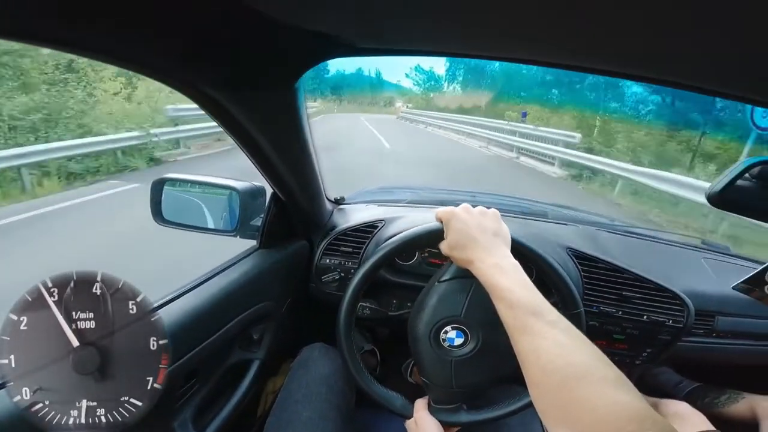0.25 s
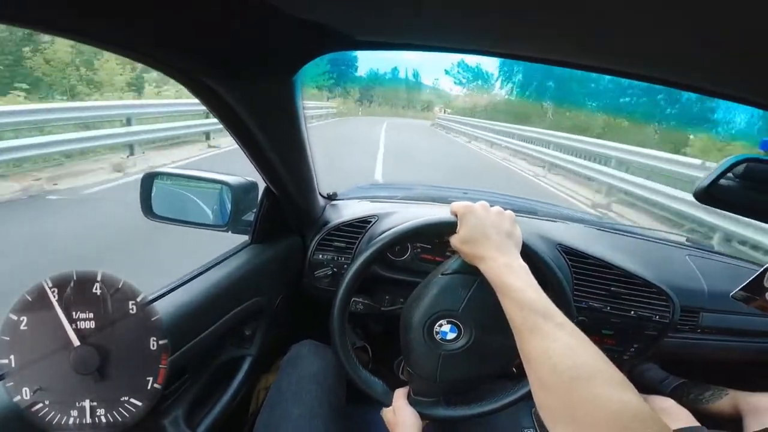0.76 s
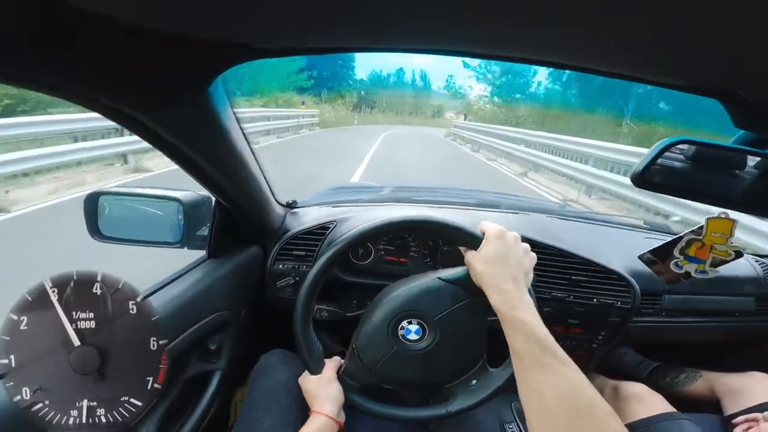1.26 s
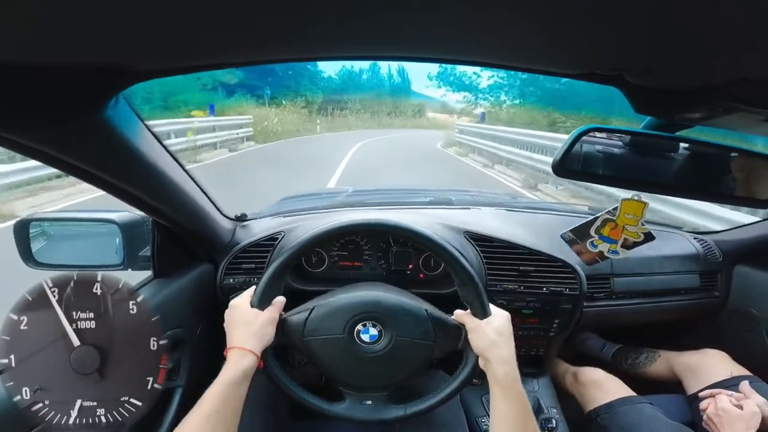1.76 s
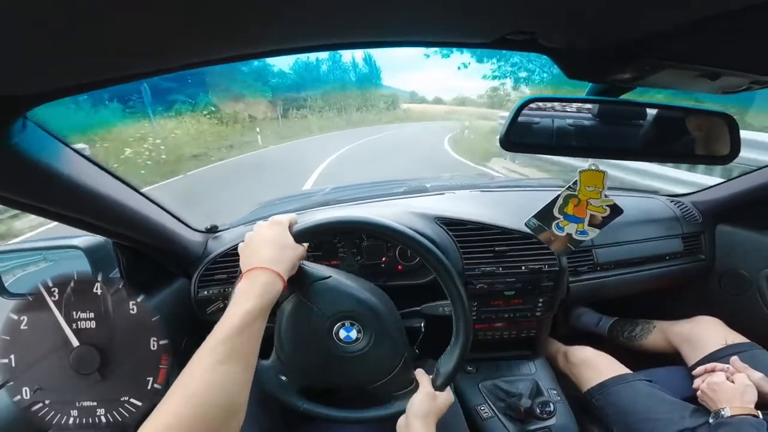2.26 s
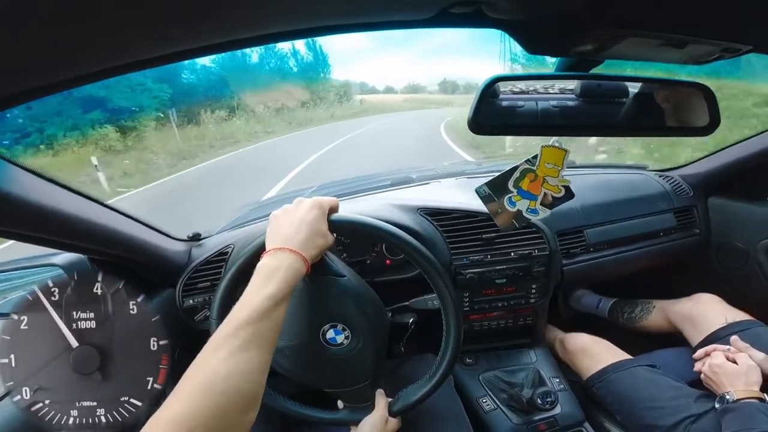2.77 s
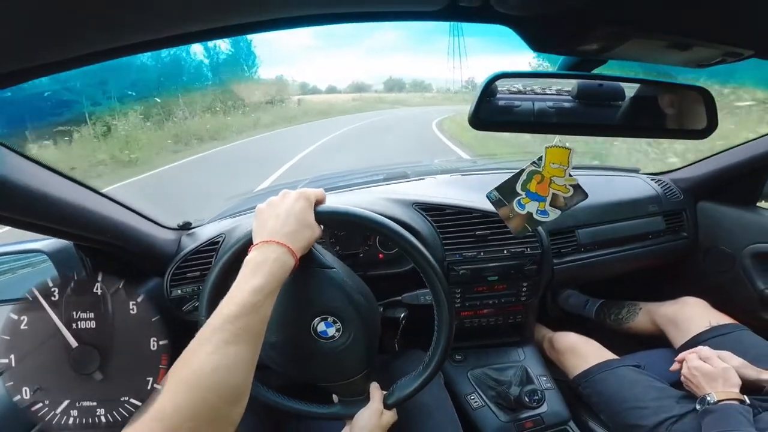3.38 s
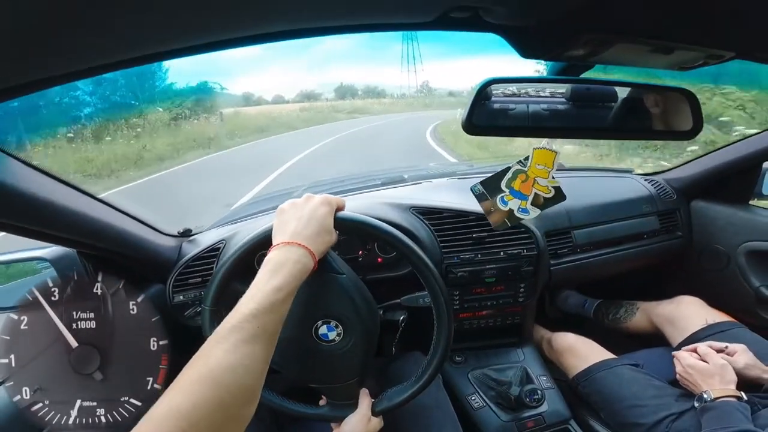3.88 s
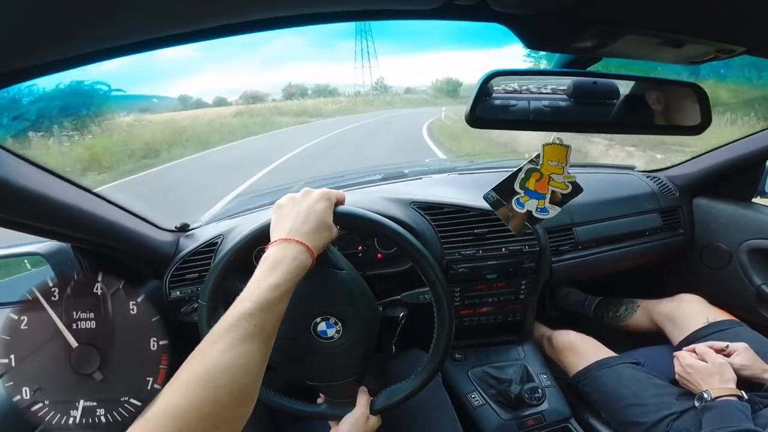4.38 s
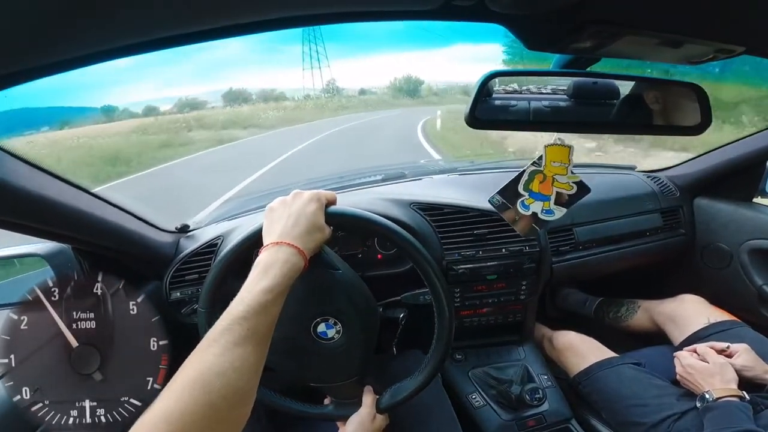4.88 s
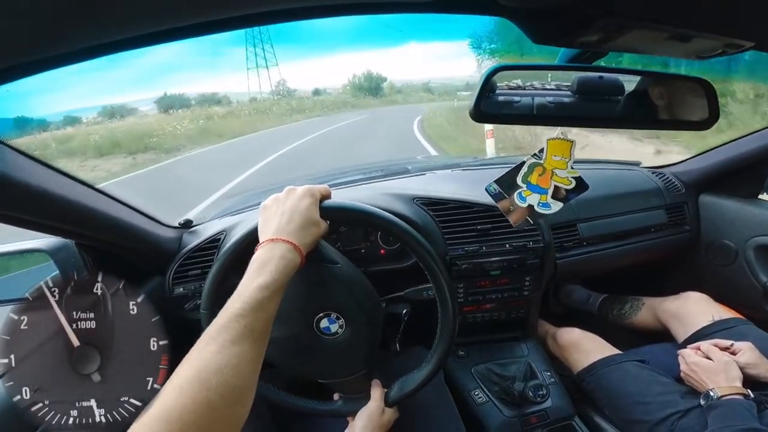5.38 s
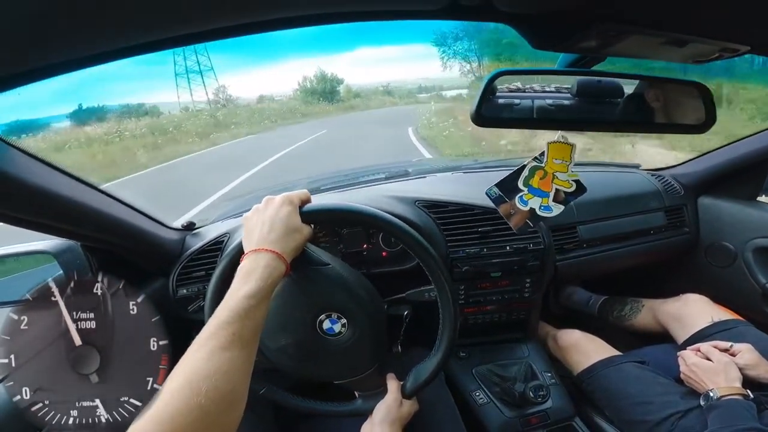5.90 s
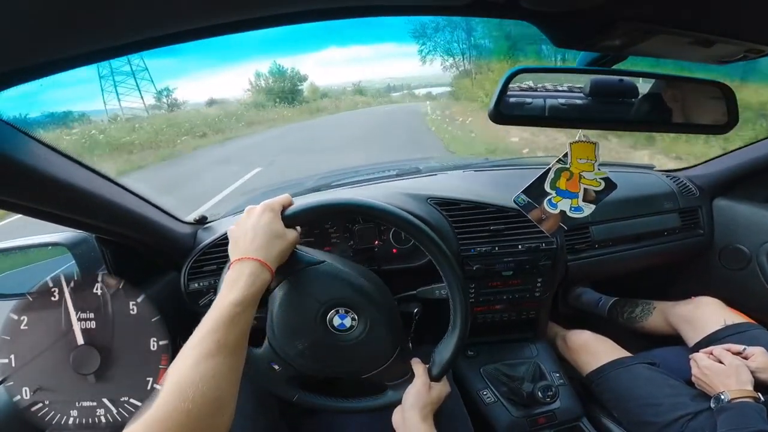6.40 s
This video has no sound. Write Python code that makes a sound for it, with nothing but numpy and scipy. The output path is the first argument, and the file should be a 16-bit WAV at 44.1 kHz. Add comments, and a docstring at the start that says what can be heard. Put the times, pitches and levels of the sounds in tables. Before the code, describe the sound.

Smooth engine drone and tyre roar in a car cabin; throttle eases, trim rattles, a coasting hum follows, then power swells and the note climbs.

```python
"""A straight-six heard from the driver's seat on a country road: its exhaust booms in the cabin as harmonic tones.
It pulls, lifts off with a low burble, coasts with the fuel cut, picks up at part throttle, then pulls up the revs.
Most engine layers follow speed and throttle, tones and noise alike; the block's drone has its own level over time.
Around them lie filtered noise for road and tyres, two road joints, damped jolts and clunks, and buzzing trim.
Two microphone ports close together give each pitch its own left-right balance."""
import sys
import numpy as np
from scipy import signal
from scipy.fft import rfft, irfft
from scipy.io import wavfile

SR = 44100
rng = np.random.default_rng(int(sys.argv[2]) if len(sys.argv) > 2 else 0)


def output_pcm(signal):
    """Save a mono or channel-first signal as 16-bit PCM at the path in sys.argv[1].

    Samples are clipped to [-1, 1] before scaling.
    """
    pcm = np.clip(np.atleast_2d(signal).T, -1, 1) * 32767
    wavfile.write(sys.argv[1], SR, np.round(pcm).astype(np.int16))


N = 293265
TIME, HZ = np.arange(N) / SR, np.fft.rfftfreq(N, 1 / SR)
# the engine's tones lie under 3 kHz and live on a coarser time grid
STEP = 7
COARSE = TIME[::STEP]

# microphone: left minus right port for tones and for noise: f/Hz, level/dB
TONE_SIDE = [(70, 2.5), (145, 0.9), (170, -3.5), (215, -0.5), (285, -2), (345, -7.5), (410, -9.5),
             (600, -4), (780, -4.5), (1200, -1)]
NOISE_SIDE = [(40, -9.5), (100, 13), (170, 3.5), (400, -4), (700, 1.5), (1100, 1), (2200, 0), (4500, 1),
              (8500, -2.5), (13000, 0)]
# likeness of the noise at the two ports: f/Hz, correlation
PORT_LIKENESS = [(40, .93), (250, .88), (600, .8), (1100, .8), (2200, .74), (4500, .58), (8000, .35),
                 (14000, .35)]
TREBLE_EDGE_HZ = 15300  # the highest treble is left out

# road rumble through the body, and tyre and wind roar: f/Hz, level/dB per Hz
RUMBLE = [(12, -102), (22, -91), (40, -77), (70, -73.5), (100, -68), (125, -76), (175, -77.5), (230, -72.5),
          (290, -76), (390, -79.5), (440, -91.5), (500, -89)]
ROAR = [(250, -100), (520, -92.5), (760, -86), (860, -91), (1030, -88), (1400, -99.5), (2380, -100),
        (2560, -109), (2900, -111), (4400, -117.5), (5100, -118), (5800, -124), (10000, -124.5),
        (13000, -124), (15000, -127)]
# coarseness of the road surface: t/s, change of roar level/dB
SURFACE_DB = [(0, 1.5), (1.5, 1.5), (3, -0.5), (4.4, -1), (5.2, 1), (6.65, 2)]
# tyres cross a road joint: t/s, slap level/dB, scuff level/dB, thump level/dB
JOINTS = [(0.709, -42, -55, -32), (1.162, -39, -45, -32)]
# ringing of a struck tyre: f/Hz, level/dB, decay time/s
TYRE = [(960, -3, .008), (1090, 0, .007), (1420, -6, .005), (1700, -11, .005)]

# loose trim buzzes briefly: t/s, sizzle level/dB, lower rattle level/dB, decay time/s, sizzle centre f/Hz
TRIM_BUZZES = [(1.203, -76, -56.5, 0.0074, 6000), (1.374, -59, -55, 0.0054, 7040),
               (1.383, -66, -62, .006, 9500), (1.447, -71, -63, 0.008, 8200),
               (1.507, -69, -62, 0.0044, 6000), (1.543, -67, -62, 0.011, 9800),
               (1.567, -70, -58, 0.0067, 5800), (1.615, -75, -56, 0.0087, 7500),
               (3.012, -73, -66, 0.013, 7000), (3.025, -66, -65, 0.013, 8500),
               (3.197, -71.5, -67, 0.0077, 6000)]
# colour of a sizzle: f/Hz, relative level/dB per Hz
SIZZLE_COLOUR = [(800, -6), (2200, 2), (3000, -1), (5000, 0), (8000, 0), (11000, -4), (12500, -16)]
# resonances of the loose trim: f/Hz, width/Hz, relative level/dB
TRIM_MODES = [(2230, 710, 5), (3300, 600, -4.5), (4260, 240, -5), (4860, 250, -1), (5040, 170, -15)]
BUZZ_ATTACK_S, CONTACTS_PER_S = 0.0025, 2200

# the body jolts at the second road joint and as the load changes:
# t/s, shudder level/dB, thud level/dB, panel boom level/dB
JOLTS = [(1.16, -39.5, -35, -36), (1.225, -36, -45.5, -45.5), (1.274, -34.5, -51.5, -51),
         (1.333, -42, -45.5, -38), (1.434, -37.5, -43.5, -39.5), (1.486, -31.5, -35.5, -44),
         (1.53, -37.5, -40, -34.5), (1.605, -34.5, -37.5, -39), (3.026, -36, -45, -52.5),
         (3.046, -40.5, -42, -30.5), (3.092, -45.5, -36.5, -44), (3.151, -39, -49.5, -51),
         (3.222, -46, -38, -36.5)]
# body shudder, cabin air thud and panel boom after a jolt: f/Hz, level/dB, decay time/s
SHUDDER = [(39.5, -1, 0.032), (65.2, -1, .03)]
CABIN_AIR = [(104, 3, 0.026)]
PANELS = [(186, -3, 0.026), (214.6, -0.5, 0.025)]
# the drive line takes up its slack: t/s, level/dB
CLUNKS = [(1.251, -51), (1.362, -44), (1.378, -44), (1.447, -49), (1.495, -51.5), (1.547, -40),
          (1.614, -39), (3.235, -45)]
# ringing of a clunk: f/Hz, level/dB, decay time/s
CLUNK_MODES = [(395, 3.5, .016), (570, -2.5, 0.012), (690, -0.5, 0.0044), (745, -1, 0.024)]
# rubber mounts cushion each blow: rise times
SHUDDER_SOFT_S, THUD_SOFT_S, CLUNK_SOFT_S = 0.011, 0.0038, 0.0038

# engine speed as the pulse rate of one three-cylinder bank: t/s, f/Hz
BANK_SPEED = [(0.0, 70.83), (0.3, 72.38), (0.75, 74.37), (1.15, 73.63), (1.75, 72.07), (2.3, 69.31),
              (2.75, 67.24), (3.05, 66.52), (3.4, 66.87), (3.65, 67.34), (3.85, 66.95), (4.3, 68.2),
              (4.65, 69.49), (5.0, 71.52), (5.35, 74.06), (5.9, 78.76), (6.65, 86.26)]
CRUISE_HZ = 71.5  # bank pulse rate at cruising speed
# the pedal: t/s, throttle 0-1
THROTTLE = [(0, 0.4), (.45, 0.56), (.8, 0.59), (1.19, 0.4), (1.29, 0.1), (1.41, 0), (1.46, 0.5),
            (1.56, 0.2), (3.15, 0.06), (3.45, 0.2), (4.35, 0.31), (4.65, 0.4), (5.2, 0.76), (6, 0.89),
            (6.65, 0.98)]
# the fuel is cut while the car coasts, and the cylinders only pump air
FUEL_OFF_S, FUEL_ON_S, FUEL_FADE_S, FUEL_RETURN_S = 1.658, 3.016, 0.023, 0.0094

# engine layers at cruising speed: level/dB throttle shut, half open, wide open, coasting; dB more per speed doubling
CLATTER_DB = (-61.5, -58.5, -59.5, -60, 29.5)
VALVES_DB = (-81.5, -82, -80, -80, 36.5)
INTAKE_DB = (-81.5, -89, -75.5, -85.5, 37)
HISS_DB = (-87.5, -87, -79.5, -81.5, 37.5)
RASP_DB = (-62.5, -64.5, -48.5, -56, 18.5)
MUTTER_DB = (-58, -72.5, -74, -74.5, -4)

# engine clatter, and air rushing into the intake: f/Hz, relative level/dB per Hz
CLATTER = [(400, -11), (560, 10), (770, 7.5), (860, 14), (1020, 14.5), (1400, 2), (1600, -3.5), (1900, 1),
           (2380, -11), (2560, -12.5), (3000, -7), (4300, -18.5), (5400, -21), (6000, -19.5)]
INTAKE = [(3200, -5), (5000, -2), (5800, -4), (6500, 0), (7400, -2), (8300, -1), (8900, 1), (9800, -2),
          (11200, -5), (12000, -14)]
# ringing of the valve gear, and resonances of the intake duct: f/Hz, width/Hz, relative level/dB
VALVE_GEAR = [(3640, 150, -4), (3990, 620, 1), (4840, 410, -5), (5320, 310, -5.5)]
DUCT = [(1195, 60, -3), (1615, 48, 0), (2280, 110, -9), (2400, 90, -9.5), (4560, 100, -15),
        (4810, 110, -12.5), (5240, 130, -17.5)]
# share of each mechanical noise that repeats from cycle to cycle
CLATTER_REPEAT, VALVES_REPEAT, DUCT_REPEAT = .62, 0.6, 0.68
# centre of the thin metallic hiss in the exhaust pipe, sliding with the heat of the gas: t/s, f/Hz
PIPE_HISS = [(0, 4380), (1.6, 4600), (2.8, 4450), (4.3, 4730), (5.5, 4630), (6.65, 4730)]

# thin whine on the engine while it coasts: multiple of the cycle rate, level/dB
WHINE_DB = {34: -64, 39: -64, 51: -74, 54: -77}
# resonances of block and cabin, struck by the firings: f/Hz, width/Hz, relative level/dB
BLOCK = [(222, 51, 1.5), (409.4, 28.5, 3.5), (602, 110, -10.5), (769.7, 35.8, 1), (879, 110, -22.5),
         (1207, 49, -22), (1601, 49, -23)]
# pattern of strong and weak cylinders in some low lines: multiple of the cycle rate, change of level/dB
CYLINDER_DB = {7: 5, 8: -8.5, 10: 6, 11: 6, 13: 1.5, 14: -1, 16: -1.5, 17: 2.5, 19: -0.5, 20: 5.5, 22: -3.5,
               23: -1.5, 28: 3.5, 31: 4, 35: 0}
# level of the block's drone: t/s, level/dB
DRONE_LEVEL = [(0, -48.5), (.45, -47.5), (.85, -52), (1.15, -49), (1.37, -48), (1.415, -56.5), (1.47, -50),
               (1.57, -49), (1.75, -65), (2.5, -50.5), (3, -48.5), (3.15, -57), (4.3, -52), (4.65, -47.5),
               (5.5, -46.5), (5.9, -48.5), (6.65, -49)]
# the upper lines hold nearly steady: share of level that wavers, drift of phase
FLUTTER, SCATTER_RAD = .17, .4
# upper exhaust harmonics: f/Hz, relative level/dB
PIPE = [(450, -8), (510, -3.5), (580, 6.5), (700, 4.5), (745, 10), (778, 14), (808, 5.5), (835, -2.5),
        (870, -13.5), (980, 5), (1100, -9), (1200, -14.5), (1400, -16.5), (1650, -16.5), (2200, -12.5),
        (2600, -23)]

# uneven firing around the fuel cut: start t/s, length/s, burble level/dB, change of the second boom harmonic/dB
BURBLES = [(1.169, .43, -47.5, 2), (3.032, 0.28, -50.5, -2)]
BURBLE_ATTACK_S, BURBLE_RELEASE_S = 0.039, 0.045
# colour of the burble: f/Hz, relative level/dB per Hz
BURBLE_COLOUR = [(20, -13), (36, 5.5), (62, 4.5), (110, 6.5), (150, 5.5), (195, 18.5), (260, 4), (310, -3),
                 (410, -6), (500, -16.5), (750, -20), (1100, -64)]
# depth of wavering of the boom and of the upper lines during uneven firing
BOOM_STUMBLE, KNOCK_STUMBLE = .28, .45
# exhaust boom before the cabin gain, a row for each of harmonics 1 to 6 of the bank rate:
# level/dB throttle shut, half open, wide open, coasting
BOOM = [(-45, -46, -52.5, -45.5), (-40, -39.5, -39, -31), (-58, -40, -38.5, -43.5),
        (-57.5, -48, -42.5, -54.5), (-67, -63.5, -50.5, -55), (-56, -49, -50, -57)]
# how the cabin favours each pitch of the boom: f/Hz, gain/dB
CABIN_GAIN = [(66, -2), (86, 4.5), (133, -7.5), (145, -1.5), (160, 7.5), (172, 10), (200, 0), (222, 4),
              (258, 3), (275, 5.5), (318, -12), (336, -0.5), (360, 1.75), (405, 5.5), (428, -2.5),
              (448, -13.5), (480, -10.5), (515, -20)]


def gain_of(db):
    """Decibels to amplitude."""
    return 10 ** (np.asarray(db) / 20)


def evened(x):
    """Scales to rms 1; of a stereo pair, the middle."""
    middle = np.atleast_2d(x).mean(0)
    return x / np.sqrt(np.mean(middle ** 2) + 1e-30)


def curve(rows, column=1, time=TIME):
    """One column of a time table at the given times."""
    rows = np.array(rows)
    return np.interp(time, rows[:, 0], rows[:, column])


def read(points, hz):
    """A spectrum table on a log-frequency axis."""
    f, value = np.transpose(points)
    return np.interp(np.log(hz + 1), np.log(f), value)


def colour(points):
    """Gain of a spectrum table, falling steeply beyond both ends."""
    low, high = points[0][0], points[-1][0]
    return gain_of(read(points, HZ)) * np.minimum(HZ / low, 1) ** 3 / np.maximum(HZ / high, 1) ** 5


def ring(modes, hz):
    """Complex response of steep resonances, each a damped mode squared."""
    return sum(gain_of(db) / (1 + 2j * (hz - f) / width) ** 2 for f, width, db in modes)


def wander(rate_hz, time=COARSE):
    """Slow random drift of rms 1: low-passed noise on coarse knots."""
    knots = np.linspace(0, N / SR, 1024)
    knot_hz = np.fft.rfftfreq(len(knots), knots[1])
    spectrum = rfft(rng.standard_normal(len(knots))) / (1 + (knot_hz / rate_hz) ** 4)
    return np.interp(time, knots, evened(irfft(spectrum)))


def ports(side_db):
    """Left and right gains with a mean of 1."""
    left = 2 / (1 + gain_of(-side_db))
    return np.array([left, 2 - left])


def noise(gain, source=None):
    """Stereo cabin noise with the given amplitude per root Hz, from a white source."""
    white = rng.standard_normal((2, N)) if source is None else source
    common, other = rfft(white)
    likeness = np.clip(read(PORT_LIKENESS, HZ), -.9, 1)
    apart = other * np.sqrt((1 - likeness) / (1 + likeness))
    pair = np.array([common + apart, common - apart])
    return irfft(pair * ports(read(NOISE_SIDE, HZ)) * gain, N) * np.sqrt(SR / 2)


def shaped(points):
    """Noise of rms 1 with the given spectrum."""
    return evened(noise(colour(points)))


def at_ports(x, lag_rad=0.17):
    """Cabin standing waves give each tone its own balance; the left lags in phase above 125 Hz and leads below."""
    z = rfft(signal.resample_poly(x, STEP, 1)[:N]) * ports(read(TONE_SIDE, HZ))
    z[0] *= np.exp(-1j * lag_rad * np.tanh((HZ - 125) / 100))
    return irfft(z, N)


def swell(s, db, half):
    """A bell-shaped envelope around time s."""
    out, near = np.zeros(N), abs(TIME - s) < .15
    out[near] = gain_of(db) * np.exp(-.5 * ((TIME[near] - s) / half) ** 2)
    return out


def burst(s, decay):
    """An envelope that rises quickly at time s and dies away."""
    age = np.clip(TIME - s, 0, 1)
    return np.minimum(age / BUZZ_ATTACK_S, 1) * np.exp(-age / decay)


def strike(modes, s, db, soft_s):
    """A cushioned blow at time s sets damped modes ringing."""
    age = np.maximum(COARSE - s, 0)
    ringing = sum(gain_of(db + mode_db) * np.exp(-age / decay) * np.sin(2 * np.pi * hz * age)
                  for hz, mode_db, decay in modes)
    return (1 - np.exp(-(age / soft_s) ** 2)) * ringing


def coasting(time):
    """1 while the fuel is cut, 0 while the engine fires."""
    since_off = (time - FUEL_OFF_S) / FUEL_FADE_S
    until_on = (FUEL_ON_S - time) / FUEL_RETURN_S
    return np.clip(.5 + np.minimum(since_off, until_on), 0, 1)


def by_throttle(levels_db, time):
    """Blends shut, half-open and wide-open levels by the pedal; takes the coasting level while the fuel is cut."""
    firing_db = np.interp(curve(THROTTLE, 1, time), [0, .5, 1], levels_db[:3])
    return firing_db + coasting(time) * (levels_db[3] - firing_db)


def effort(law_db, time=TIME):
    """Gain of an engine layer: it depends on the throttle and changes with speed."""
    doublings = np.log2(curve(BANK_SPEED, 1, time) / CRUISE_HZ)
    return gain_of(by_throttle(law_db, time) + law_db[-1] * doublings)


def spell(s, length, time):
    """A spell of uneven firing sets in quickly to be full at s, holds and dies away."""
    attack = np.clip(1 + (time - s) / BURBLE_ATTACK_S, 0, 1)
    return attack * np.exp(-np.maximum(time - s - length, 0) / BURBLE_RELEASE_S)


def unevenness(time=TIME):
    """Strength of the uneven firing."""
    return sum(gain_of(db) * spell(s, length, time) for s, length, db, _ in BURBLES)


def stumble(depth=.4, rate_hz=16):
    """Random wavering that grows while the cylinders fire unevenly."""
    uneven = unevenness(COARSE)
    return depth * uneven / uneven.max() * wander(rate_hz)


def cyclic(turn, share):
    """White noise of which a share repeats with every engine cycle, so that its fine lines glide with the revs."""
    pattern = signal.resample(rng.standard_normal((2, 1500)), 30000, axis=1)
    place = turn / (2 * np.pi) % 1 * pattern.shape[1]
    again = pattern[:, place.astype(int)]
    share = np.clip(share, 0, 1)
    return np.sqrt(share) * again + np.sqrt(1 - share) * rng.standard_normal((2, N))


def knock_phase(k, cycle_hz, smear=.42):
    """Every line of one knock passes through the same block, so neighbours beat steadily once a cycle."""
    return smear * k ** 2 + np.angle(ring(BLOCK, k * cycle_hz))


def road(bumps_db=-0.5, gusts_db=1.03):
    """Rumble follows the unevenness of the asphalt; the tyre and wind roar swells and eases more slowly."""
    bumps, gusts = wander(7, TIME), wander(4, TIME)
    rumble = noise(colour(RUMBLE)) * gain_of(bumps_db * bumps)
    roar = noise(colour(ROAR)) * gain_of(curve(SURFACE_DB) + gusts_db * gusts)
    return rumble + roar


def joints(scuff_half=0.011, scuff_delay=0.0025, slap_soft_s=0.001,
           thump_hz=100, thump_delay=0.041, thump_half=0.025):
    """The tread scuffs and slaps the joint, then the suspension passes a low thump into the body."""
    tread = evened(noise(abs(ring([(1006, 170, 18), (1410, 450, 6.2)], HZ))))
    thump_sides = ports(read(NOISE_SIDE, thump_hz))[:, None]
    out, slaps = np.zeros((2, N)), 0
    for s, slap_db, scuff_db, thump_db in JOINTS:
        slaps = slaps + strike(TYRE, s, slap_db, slap_soft_s)
        thump = swell(s + thump_delay, thump_db, thump_half) * np.sin(2 * np.pi * thump_hz * (TIME - s))
        out += swell(s + scuff_delay, scuff_db, scuff_half) * tread + thump_sides * thump
    return out + at_ports(slaps)


def trim(width_hz=4500):
    """Loose pieces chatter in quick runs of tiny contacts, each run with a sizzle colour of its own."""
    contacts = rng.standard_normal((2, N)) * (rng.random(N) < CONTACTS_PER_S / SR)
    rattle = evened(noise(abs(ring(TRIM_MODES, HZ)), contacts))
    out = 0
    for s, sizzle_db, rattle_db, decay, hz in TRIM_BUZZES:
        band = colour(SIZZLE_COLOUR) / np.hypot(1, 2 * (HZ - hz) / width_hz)
        sizzle = evened(noise(band, contacts))
        out = out + burst(s, decay) * (gain_of(sizzle_db) * sizzle + gain_of(rattle_db) * rattle)
    return out


def jolts():
    """At each jolt the body shudders, cabin air thuds and panels boom; the drive line clunks as it takes up slack."""
    blows = 0
    for s, shudder_db, thud_db, panel_db in JOLTS:
        blows = blows + strike(SHUDDER, s, shudder_db, SHUDDER_SOFT_S)
        blows = blows + strike(CABIN_AIR, s, thud_db, THUD_SOFT_S)
        blows = blows + strike(PANELS, s, panel_db, THUD_SOFT_S)
    clunks = sum(strike(CLUNK_MODES, s, db, CLUNK_SOFT_S) for s, db in CLUNKS)
    return at_ports(blows + clunks)


def clatter(turn, duct_db=8, firing_depth=0.12, cycle_depth=0.051):
    """Mechanical noise and intake air partly repeat each cycle, and throb with every firing and once a cycle."""
    throb = evened(1 + firing_depth * np.cos(6 * turn) + cycle_depth * np.cos(turn))
    metal = evened(noise(colour(CLATTER), cyclic(turn, CLATTER_REPEAT)))
    valves = evened(noise(abs(ring(VALVE_GEAR, HZ)), cyclic(turn, VALVES_REPEAT)))
    duct = evened(noise(abs(ring(DUCT, HZ)), cyclic(turn, DUCT_REPEAT)))
    air = shaped(INTAKE) + gain_of(duct_db) * duct
    return throb * (effort(CLATTER_DB) * metal + effort(VALVES_DB) * valves + effort(INTAKE_DB) * air)


def pipe_hiss(turn, width_hz=110, pulsing=0.22):
    """Gas whistles through the pipe in a narrow band, in step with the firings."""
    band = 1 / (1 + (HZ / width_hz) ** 2)
    carrier = 2 * np.pi * np.cumsum(curve(PIPE_HISS)) / SR
    hiss = noise(band) * np.cos(carrier) + noise(band) * np.sin(carrier)
    return effort(HISS_DB) * evened(hiss * (1 + pulsing * np.cos(6 * turn)))


def whine(turn, cycle_hz, flutter=0.18):
    """A few high harmonics stand out while the wheels drive the engine."""
    lines = 0
    for k, db in WHINE_DB.items():
        level = gain_of(db) * (1 + flutter * wander(5))
        lines = lines + level * np.cos(k * turn + knock_phase(k, cycle_hz))
    return coasting(COARSE) * np.sqrt(2) * lines


def drone(turn, cycle_hz):
    """Unequal cylinders knock the block once a cycle: smeared lines of the cycle rate swell in each resonance."""
    out = 0
    for k in range(4, 76):
        if k % 3 or k > 29:  # the lower exhaust harmonics are left to boom and rasp
            level = gain_of(CYLINDER_DB.get(k, 0)) * abs(ring(BLOCK, k * cycle_hz))
            level = level * (1 + FLUTTER * wander(5.9))
            out = out + level * np.cos(k * turn + knock_phase(k, cycle_hz) + SCATTER_RAD * wander(1.7))
    return gain_of(curve(DRONE_LEVEL, 1, COARSE)) * evened(out)


def rasp(turn, cycle_hz):
    """The higher harmonics of the exhaust puffs come through as the throttle opens wide."""
    out = 0
    for k in range(21, 100, 3):
        level = gain_of(read(PIPE, k * cycle_hz)) * (1 + FLUTTER * wander(4.0))
        out = out + level * np.cos(k * turn + knock_phase(k, cycle_hz))
    return effort(RASP_DB, COARSE) * evened(out)


def burble():
    """Uneven firing makes low exhaust noise around the fuel cut, over a low mutter loudest with the throttle shut."""
    return (unevenness() + effort(MUTTER_DB)) * shaped(BURBLE_COLOUR)


def boom(turn, cycle_hz, shake=0.023, smear=0.457):
    """Each bank puffs three times a cycle; the silencer leaves a few clean low harmonics and smears each puff."""
    out = 0
    note_db = sum(db * spell(s, length, COARSE) for s, length, _, db in BURBLES)
    for k, levels_db in enumerate(BOOM, 1):
        cabin_db = read(CABIN_GAIN, 3 * k * cycle_hz)
        level_db = by_throttle(levels_db, COARSE) + cabin_db + (k == 2) * note_db
        level = gain_of(level_db) * (1 + shake * wander(9.7))
        out = out + level * np.cos(3 * k * turn + smear * k ** 2 + shake * wander(14))
    return np.sqrt(2) * out


def scene():
    """One four-stroke cycle takes two turns of the crankshaft and paces the engine's tones and pulses."""
    cycle_hz = curve(BANK_SPEED) / 3
    turn = 2 * np.pi * np.cumsum(cycle_hz) / SR  # one round of phase per cycle
    # the tones' phase wavers during uneven firing
    crank = turn[::STEP] + stumble(depth=0.044, rate_hz=11.0), cycle_hz[::STEP]
    background = road() + joints() + trim() + jolts()
    machinery = clatter(turn) + pipe_hiss(turn)
    knocks = (rasp(*crank) + drone(*crank)) * (1 + stumble(depth=KNOCK_STUMBLE))
    exhaust = boom(*crank) * (1 + stumble(depth=BOOM_STUMBLE))
    return background + machinery + burble() + at_ports(whine(*crank) + knocks + exhaust)


def record(dry):
    """The left port lies slightly farther from the engine, two samples late; a low-pass leaves out the top treble."""
    heard = np.array([np.pad(dry[0], (2, 0))[:N], dry[1]])
    low_pass = signal.firwin(511, TREBLE_EDGE_HZ, window=("kaiser", 9), fs=SR)
    return signal.oaconvolve(heard, low_pass[None], "same")


dry = scene()
out = record(dry)
output_pcm(out)
```